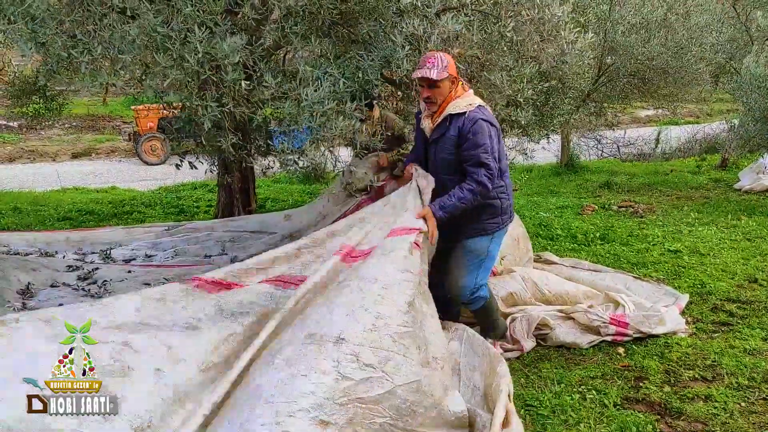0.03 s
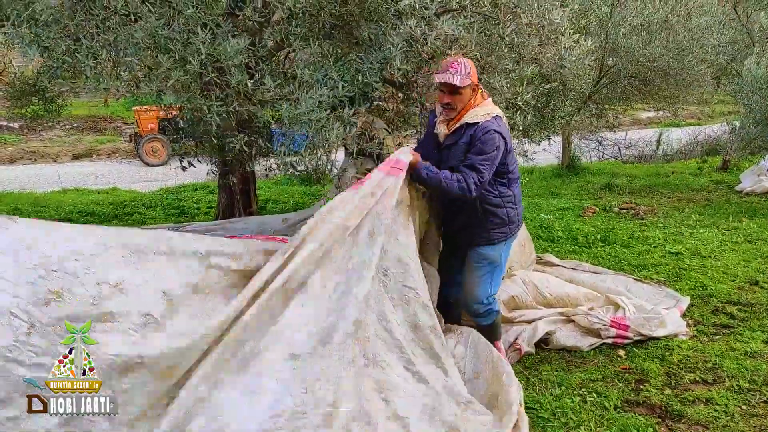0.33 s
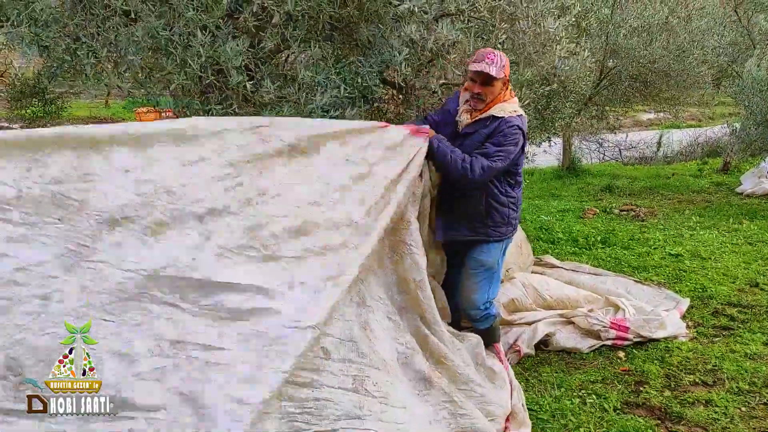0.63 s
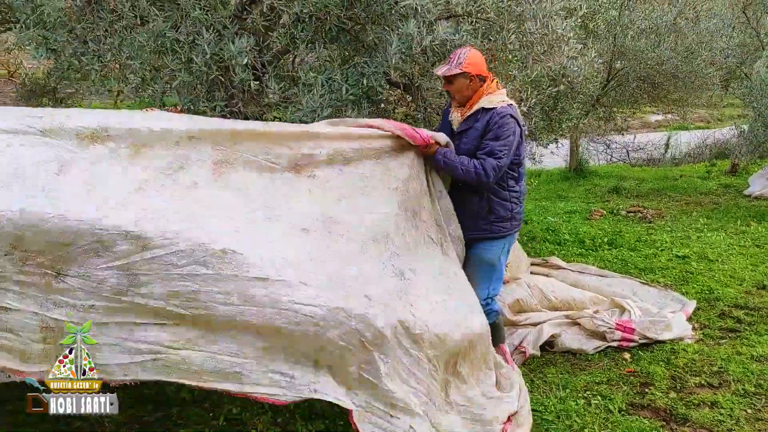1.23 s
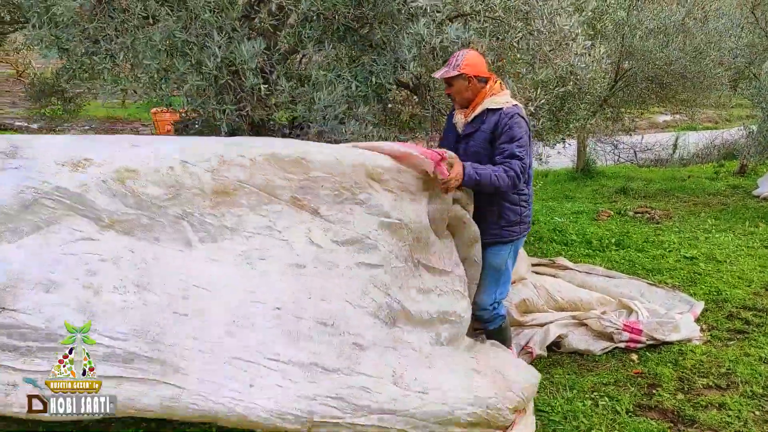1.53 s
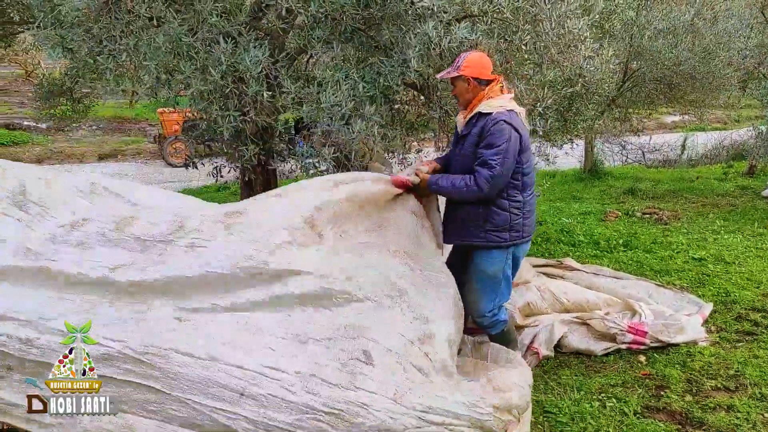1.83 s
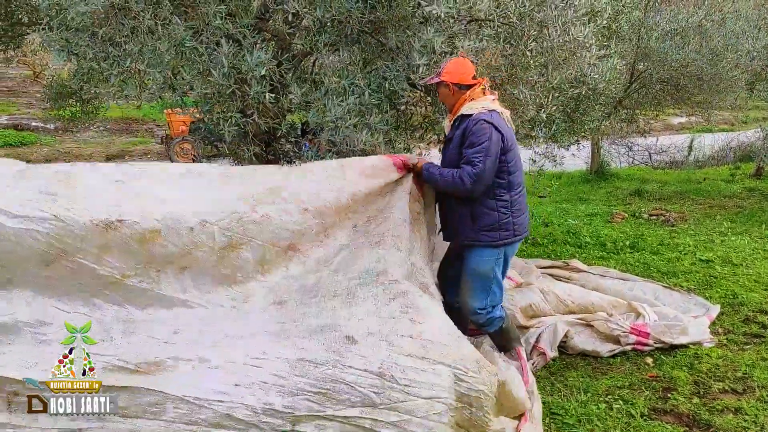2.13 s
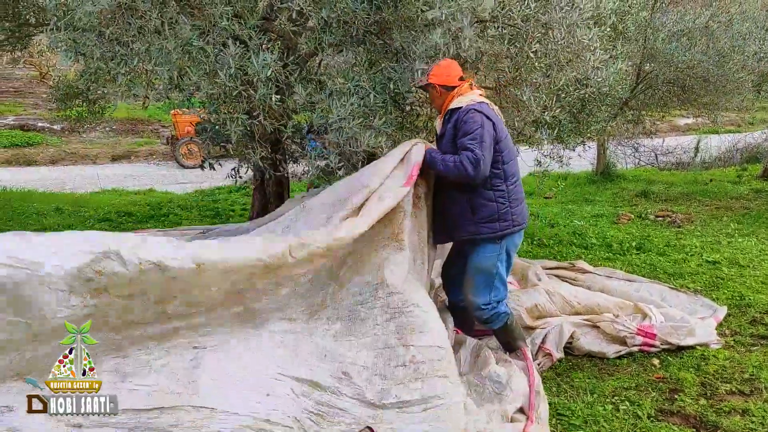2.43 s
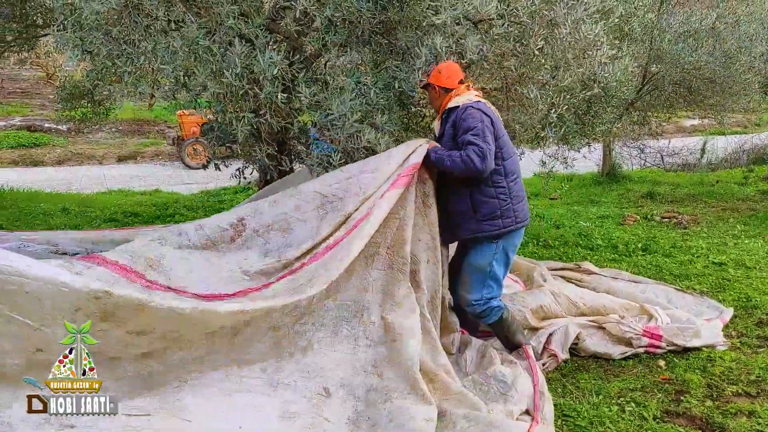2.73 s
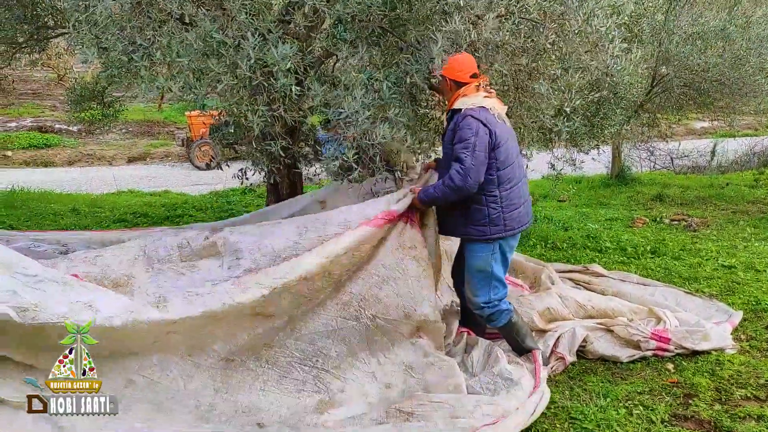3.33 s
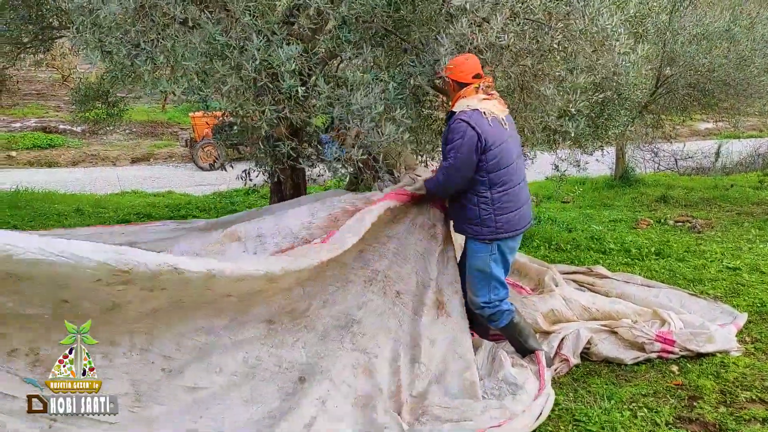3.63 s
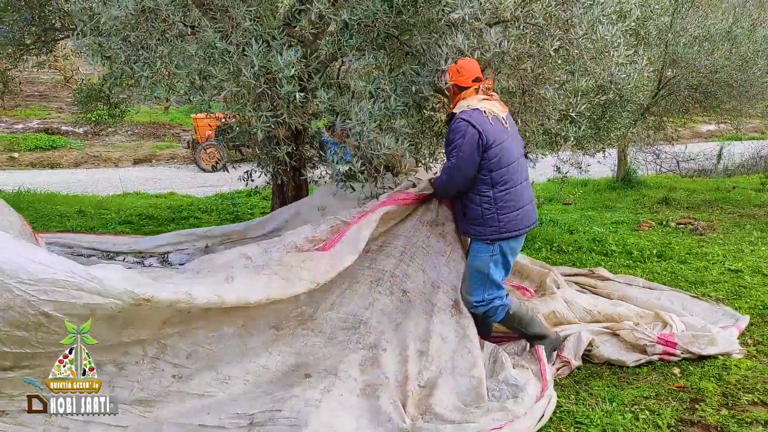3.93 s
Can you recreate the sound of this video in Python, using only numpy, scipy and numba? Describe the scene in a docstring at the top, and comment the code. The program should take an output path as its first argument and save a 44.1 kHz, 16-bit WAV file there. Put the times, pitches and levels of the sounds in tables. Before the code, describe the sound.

A large cloth tarp is lifted and shaken outdoors, hissing, snapping and throwing puffs of air that buffet the microphone. Behind it, a distant machine clatters steadily with a faint whine.

```python
"""A large cloth tarp is lifted and shaken in an olive grove. Its weave hisses and crackles as it slides,
brighter on the left; folds snap taut and slack cloth flaps. Wind buffets the two microphone ports separately.
Some way off a machine, probably a harvesting rake, clatters: strokes knock, metal rings, gears whine."""
import sys
import numpy as np
from scipy import signal
from scipy.fft import rfft, irfft
from scipy.io import wavfile
from scipy.ndimage import uniform_filter1d
from numba import njit

SR = 44100
rng = np.random.default_rng(int(sys.argv[2]) if len(sys.argv) > 2 else 0)


def store_pcm(level_fs):
    """Save levels as 16-bit WAV."""
    pcm = np.round(np.clip(level_fs, -1, 1) * 32767).astype(np.int16)
    wavfile.write(sys.argv[1], SR, np.atleast_2d(pcm).T)


N = 176400
T = np.arange(N) / SR
FREQS = np.maximum(np.arange(N // 2 + 1) * SR / N, 1)


def undb(db):
    """Decibels to gain."""
    return 10 ** (np.asarray(db) / 20)


def unit(x):
    """Scale to rms 1."""
    return x / np.sqrt(np.mean(x ** 2))


def curve(rows):
    """Piecewise-linear control from (time_s, value) rows."""
    return np.interp(T, *np.array(rows, float).T)


def spectrum(rows):
    """Table columns interpolated over log frequency."""
    hz, *columns = np.array(rows, float).T
    return np.array([np.interp(np.log(FREQS), np.log(hz), column) for column in columns])


def colour(x, rows):
    """Stereo EQ; white noise keeps its power."""
    return irfft(rfft(x) * unit(undb(spectrum(rows))), N)


def noise():
    """Independent white noise per port."""
    return rng.standard_normal((2, N))


def band(hz, q):
    """Stereo band noise with steep skirts, rms 1."""
    return unit(irfft(rfft(noise()) / (1 + (q * (FREQS / hz - hz / FREQS)) ** 2), N))


def walk(rate_hz):
    """Smooth random control, rms 1."""
    hold = int(SR / rate_hz)
    steps = np.repeat(rng.standard_normal(N)[:N // hold + 1], hold)
    return unit(uniform_filter1d(steps, hold)[:N])


def bursts(times_s, levels_db, decay_s):
    """Power envelope of decaying impulses, mean 1."""
    power = np.zeros(N)
    np.add.at(power, (times_s * SR).astype(int) % N, undb(levels_db) ** 2)
    power = signal.lfilter([1], [1, -np.exp(-2 / (decay_s * SR))], power)
    return power / power.mean()


def even(x, window_s):
    """Hold short-term rms at 1."""
    return x / np.sqrt(uniform_filter1d(x ** 2, int(window_s * SR)) + 1e-9)


@njit
def lowpass(x, corner_hz):
    """Two-pole low-pass with a moving corner."""
    y, band_state, low_state = np.empty(len(x)), 0., 0.
    for i in range(len(x)):
        g = np.tan(np.pi * corner_hz[i] / SR)
        bandpass = (band_state + g * (x[i] - low_state)) / (1 + g * (g + 1.4))
        y[i] = low_state + g * bandpass
        band_state, low_state = 2 * bandpass - band_state, 2 * y[i] - low_state
    return y


def ground_echo(x, lag_s=0.0024, drift_s=0.00016, echo_db=-10):
    """Add a ground reflection whose lag drifts as the machine moves."""
    delayed_s = T - lag_s - drift_s * walk(1.512)
    return x + undb(echo_db) * np.array([np.interp(delayed_s, T, side) for side in x])


def churn(x, depth_db=2.2, width_hz=300, smooth_s=0.2):
    """Narrow spectral regions swell and sink independently."""
    size = 1024
    frames = signal.stft(x, nperseg=size)[2]
    wander = uniform_filter1d(rng.standard_normal(frames.shape[1:]), int(width_hz * size / SR), axis=0)
    wander = unit(uniform_filter1d(wander, int(smooth_s * SR / size), axis=1))
    return signal.istft(frames * unit(undb(depth_db * wander)), nperseg=size)[1][:, :N]


# Machine speed, slowing under load: time_s, strokes_per_s
STROKE_SPEED = [(0, 32.9), (.5, 32.8), (.7, 30.4), (.9, 31.6), (1.15, 31.8), (1.38, 32.95), (2.2, 33),
                (2.5, 33.35), (2.7, 32.8), (2.9, 30.9), (3.4, 31.1), (3.6, 32.9), (4, 32.7)]

def strokes(return_phase=0.27, return_db=-10, jitter_s=0.0016, scatter_db=3.5, free_rate_hz=33):
    """Envelope of stroke and return knocks, blurred by the trees; smears into a rush under load."""
    rate_hz = curve(STROKE_SPEED)
    turns = np.cumsum(rate_hz) / SR
    stroke = np.arange(int(turns[-1]))
    timing, force = rng.standard_normal((N // 100, 2, 2))[:len(stroke)].T
    times_s = np.interp([stroke, stroke + return_phase], turns, T) + jitter_s * timing
    levels_db = np.array([[0], [return_db]]) + scatter_db * force
    knocks = bursts(times_s.ravel(), levels_db.ravel(), decay_s=0.011)
    blurred = np.abs(uniform_filter1d(knocks, int(0.0065 * SR)))
    rush = undb(1 + 5 * (free_rate_hz - rate_hz))
    return np.sqrt((blurred + rush) / (1 + rush))


# Metal resonances: centre_hz, q, left_db, right_db
RING_MODES = [(2274, 7.1, 0, -9), (4220, 4.7, 1, -6)]
# Ring loudness: time_s, level_db
RING_LEVEL = [(0, -40), (.5, -59), (1.5, -40.5), (2.6, -54), (2.95, -41), (3.3, -43), (3.55, -37),
              (4, -38.5)]

def tines(clatter):
    """Metal, probably the tines, rings with each knock."""
    rings = sum(band(hz, q) * undb([[left_db], [right_db]]) for hz, q, left_db, right_db in RING_MODES)
    return rings * clatter * undb(curve(RING_LEVEL))


# Clatter arrival at the ports: freq_hz, coherence, right_lead_rad
CLATTER_ARRIVAL = [(790, 0.1, 1), (1390, 0.99, 3.58), (1605, 1, 3.23), (2180, 0.36, 4.7), (2810, 1, 5.63),
                   (2740, 0.98, 4.44), (3220, 0.26, 5.7), (3980, 0.8, 8.37), (5350, 0.15, 14.8),
                   (6300, 0.3, 7.8), (7400, .6, 22), (8000, 0.8, 1.95)]
# Clatter spectrum: freq_hz, left_db, right_db
CLATTER_EQ = [(202, -3, 4), (514, -11, -19), (980, -9.5, -16.5), (1550, -4.5, -1), (1466, 1.5, 1.5),
              (2050, -1.5, -5.5), (2110, -0.5, -5.5), (2700, 0, 1), (3003, 5, 3), (3000, -1.5, -10.5),
              (3890, -2, -2.5), (3740, 3, 0.5), (4980, -2.5, -9.5), (6150, 1.5, -29), (8180, 0, -20),
              (8870, -6.5, -16), (9300, -84, -93), (15500, -23, -43)]
# Clatter loudness: time_s, level_db
CLATTER_LEVEL = [(0.0, -39.5), (0.03, -36), (1.06, -37), (1.09, -39), (1.59, -35.5), (1.75, -36.5),
                 (3.91, -37.5), (4.0, -35)]

def machine(gain_db=4.5):
    """Distant knocks, partly coherent between the ports, with ground echo and ringing metal."""
    clatter = strokes()
    left, independent = rfft(noise() * clatter)
    coherence, lead_rad = spectrum(CLATTER_ARRIVAL)
    coherence = np.clip(coherence, 0, 1)
    right = coherence * np.exp(1j * lead_rad) * left + np.sqrt(1 - coherence ** 2) * independent
    body = colour(irfft(np.array([left, right]), N), CLATTER_EQ)
    body *= undb(curve(CLATTER_LEVEL) + gain_db)
    return churn(ground_echo(body) + tines(clatter))


# Gear whine lines: mesh_harmonic, left_db, right_db
GEAR_LINES = [(2, -50, -48), (3, -51, -63), (4, -43, -61.5)]
# Whine swells: time_s, lowest_line_db, higher_lines_db
GEAR_SWELLS = [(0, 3, -2), (.5, 1, -6), (1.1, -4, 1.5), (2.5, 1.5, 4), (3.0, -3, -26), (3.7, 2, 9.5),
               (4, -17, -7)]

def gears(teeth=45, wobble=0.009, jitter=0.015, flicker_db=2):
    """Meshing teeth whine; their speed sways within each stroke and trembles."""
    rate_hz = curve(STROKE_SPEED)
    sway = wobble * np.sin(2 * np.pi * np.cumsum(rate_hz) / SR) + jitter * walk(300)
    mesh_rad = 2 * np.pi * np.cumsum(teeth * rate_hz * (1 + sway)) / SR
    times_s, lowest_db, higher_db = np.array(GEAR_SWELLS, float).T
    out = np.zeros((2, N))
    for (harmonic, left_db, right_db), swell_db in zip(GEAR_LINES, (lowest_db, higher_db, higher_db)):
        line = unit(np.sin(harmonic * mesh_rad) * undb(flicker_db * walk(11)))
        out += line * undb(np.interp(T, times_s, swell_db)) * undb([[left_db], [right_db]])
    return out


def buffet(eddies, push_db, flutter_db, ref_hz, ref_db=-28.5, db_per_octave=7.5):
    """Air on one port: the harder it pushes, the brighter it sounds."""
    push = undb(push_db + flutter_db * walk(50))
    corner_hz = ref_hz * 2 ** ((20 * np.log10(push + 1e-4) - ref_db) / db_per_octave)
    return lowpass(eddies * push, np.minimum(corner_hz, SR / 10))


# Eddy spectrum: freq_hz, left_db, right_db
EDDY_EQ = [(20, -0.5, 3.5), (44.3, 3.5, 1.5), (81, -8, -2), (132, -8.5, -2.5), (154, -8, 3.5),
           (225, -11.5, -1.5), (510, -23.5, -8), (1310, -2, -4), (3000, -45.5, -27)]
# Airflow over each port: time_s, push_db
FLOW_LEFT = [(0, -37), (0.1, -57), (0.35, -38), (0.6, -32.5), (0.95, -32.5), (1.13, -26.5), (1.35, -32.5),
             (1.52, -40), (1.65, -28), (2.05, -41.5), (2.2, -32), (2.55, -45), (2.7, -41), (2.85, -64),
             (3.35, -54), (3.6, -29.5), (3.75, -34), (3.9, -31), (4, -30)]
FLOW_RIGHT = [(0, -38), (0.22, -35), (0.42, -26.5), (0.57, -25), (0.635, -29.5), (0.78, -24.5), (1.12, -29),
              (1.3, -32), (1.65, -29.5), (1.78, -29.5), (2.0, -31.5), (2.12, -37.5), (2.3, -31.5),
              (2.45, -37.5), (2.57, -30.5), (2.67, -39.5), (2.8, -31), (3.35, -33.5), (3.52, -33),
              (3.68, -45), (3.87, -32.5), (4, -39.5)]

def airflow(left_db=7, right_db=5):
    """Wind eddies buffet each port separately."""
    eddies = colour(noise(), EDDY_EQ)
    left = buffet(unit(eddies[0]), curve(FLOW_LEFT), flutter_db=1.5, ref_hz=265)
    right = buffet(unit(eddies[1]), curve(FLOW_RIGHT), flutter_db=1.7, ref_hz=376)
    return np.array([left * undb(left_db), right * undb(right_db)])


def billow(peak_s=0.793, width_s=0.2, level_db=-27, flutter_db=1.7):
    """The lifted tarp billows with one brief roar; mono."""
    swell = np.exp(-2 * ((T - peak_s) / width_s) ** 2)
    return band(hz=500, q=0.93)[1] * swell * undb(level_db + flutter_db * walk(50))


# Air puffs: start_s, level_db, hold_s, corner_hz
AIR_PUFFS = [(0.081, -23.5, 0.032, 440), (0.37, -18.5, 0.007, 805), (0.468, -18, 0.01, 1090),
             (0.656, -16.5, 0.0099, 1400), (0.676, -12, 0.021, 770), (0.899, -19.5, 0.004, 1400),
             (0.918, -21, 0.0062, 850), (1.038, -15.5, 0.0069, 810), (1.262, -19.5, 0.0064, 460),
             (1.487, -22.5, 0.007, 400), (1.535, -24.5, 0.0054, 750), (1.647, -22.5, .03, 455),
             (1.692, -16, 0.019, 400), (1.849, -20.5, .013, 484), (2.352, -16, .012, 624),
             (2.375, -19.5, 0.014, 380), (2.54, -26, 0.012, 304), (2.705, -23, 0.0072, 480),
             (2.743, -23, 0.043, 340), (2.875, -13, 0.012, 430), (2.976, -16.5, 0.013, 280),
             (3.022, -20.5, 0.03, 330), (3.311, -22.5, 0.012, 650), (3.421, -18, 0.015, 342)]

def puffs(attack_s=0.004, release_s=0.008, dulling_s=0.087, rumble_db=-4):
    """Puffs of wind strike, hold and dull as they die; mono."""
    rumble = unit(colour(noise(), EDDY_EQ)[1])
    eddies = even(band(hz=256, q=0.66)[1] + undb(rumble_db) * rumble, window_s=0.006)
    out = np.zeros(N)
    for start_s, level_db, hold_s, corner_hz in AIR_PUFFS:
        span = slice(int(start_s * SR), int(start_s * SR) + SR // 8)
        age_s = T[span] - T[span][0]
        envelope = np.minimum(age_s / attack_s, 1) * np.exp(-np.maximum(age_s - hold_s, 0) / release_s)
        puff = eddies[span] * envelope * undb(level_db)
        out[span] += lowpass(puff, corner_hz * np.exp(-age_s / dulling_s))
    return out


# Dull flaps: start_s, level_db, centre_hz, decay_s, left_minus_right_db
CLOTH_FLAPS = [(0.362, -36.5, 1080, 0.066, 9.5), (1.3242, -31.5, 670, 0.0036, -10),
               (1.403, -27.5, 1200, 0.0052, 11)]

def flaps():
    """Slack cloth slaps against itself."""
    out = np.zeros((2, N))
    for start_s, level_db, centre_hz, decay_s, pan_db in CLOTH_FLAPS:
        envelope = (T >= start_s) * np.exp(-abs(T - start_s) / decay_s)
        gains = undb([[level_db + pan_db / 2], [level_db - pan_db / 2]])
        out += band(centre_hz, q=0.85) * envelope * gains
    return out


# Fold snaps: start_s, level_db, hold_s
FOLD_SNAPS = [(0.599, -20.5, 0.0022), (0.727, -17, 0.0008), (0.738, -20, 0.0022), (0.79, -23, .001),
              (0.8744, -20.5, 0.0031), (0.9797, -12.5, 0.0011), (1.275, -11.5, 0.0042),
              (2.049, -22, 0.0011), (2.771, -19, 0.0011), (2.996, -23, .001), (3.272, -20, 0.001),
              (3.348, -27, 0.00093), (3.484, -21, 0.0035), (3.538, -18, 0.0034)]

def snaps(crack_db=1, crack_s=0.0006, release_s=0.0014, tail_db=-26, tail_s=0.01):
    """Power envelope of folds snapping taut: sharp crack, short hold, faint tail."""
    power = np.zeros(N)
    for start_s, level_db, hold_s in FOLD_SNAPS:
        after_s = np.maximum(T - start_s - hold_s, 0)
        body = np.exp(-after_s / release_s) + undb(tail_db) * np.exp(-after_s / tail_s)
        crack = undb(crack_db) * np.exp(-abs(T - start_s) / crack_s)
        power += (T >= start_s) * (undb(level_db) * (body + crack)) ** 2 / 4
    return power


def crackles(per_s=140, level_db=-3):
    """Power envelope of small creases crackling at random, relative to the hiss."""
    when, rarity = rng.random((int(per_s * N / SR), 2)).T
    sizes_db = -3 * np.log(np.maximum(rarity, 0.15))
    return undb(level_db) ** 2 * bursts(when * N / SR, sizes_db, decay_s=0.0014)


# Sliding of the cloth: time_s, drive_db
SLIDE_DRIVE = [(0.0, -37.5), (0.29, -38), (0.37, -34.5), (0.56, -37.5), (0.58, -35), (1.26, -37.5),
               (1.28, -33.5), (1.29, -35.5), (1.34, -38), (1.68, -37.5), (2.26, -39), (2.76, -36.5),
               (3.34, -36), (3.35, -34), (3.42, -37.5), (3.53, -36.5), (3.79, -39), (4.0, -37)]
# Weave spectrum: freq_hz, left_db, right_db
WEAVE_EQ = [(510, -13, -15.5), (1500, -38, -27), (3550, -15.5, -17.5), (4700, -9.5, -11.5),
            (5350, -1.3, -8), (7280, 3.5, -15), (8760, -2.5, -18), (9520, -24, -21), (9900, -38.5, -33),
            (12700, -25.5, -35.5), (13500, -22, -48), (15500, -26.5, -52)]

def tarp(ref_db=-36, hiss_db=-30, hiss_slope=2.89, sheen_db=-51.5, sheen_slope=4.9):
    """The sliding weave hisses, crackles and snaps; fine fibres add a high sheen when it slides fast."""
    drive_db = curve(SLIDE_DRIVE) - ref_db
    hiss_power = undb(hiss_db + hiss_slope * drive_db) ** 2 / 2
    weave = noise() * np.sqrt(hiss_power * (1 + crackles()) + snaps())
    slow_drive_db = np.minimum(uniform_filter1d(drive_db, SR // 8), 3)
    sheen = band(hz=11500, q=4.5) * undb(sheen_db + sheen_slope * slow_drive_db)
    return colour(weave, WEAVE_EQ) + sheen * undb([[0], [-14]])


def scene():
    """Machine, cloth and moving air; billow and puffs reach only the right port."""
    mix = machine() + gears() + tarp() + flaps() + airflow()
    mix[1] += billow() + puffs()
    return mix


def record(dry):
    """Steep low-pass at 15.85 kHz."""
    return signal.sosfilt(signal.ellip(10, .2, 80, 15850, fs=SR, output="sos"), dry)


dry = scene()
out = record(dry)
store_pcm(out)
```